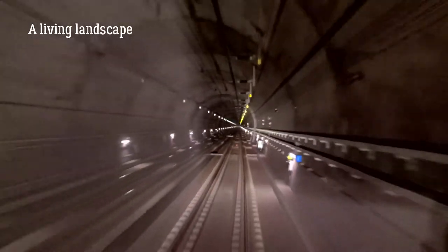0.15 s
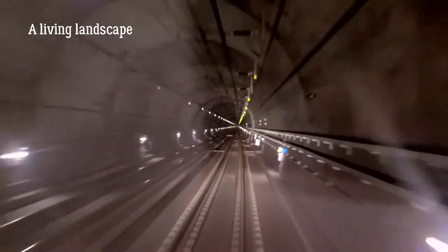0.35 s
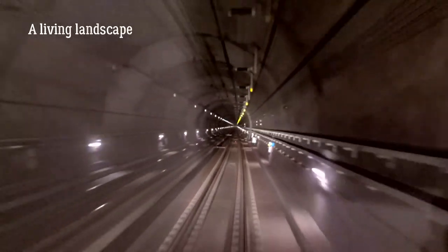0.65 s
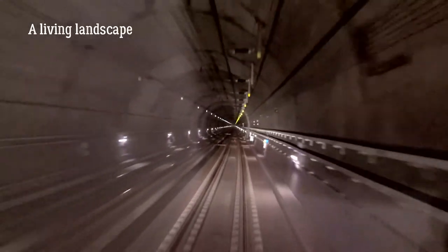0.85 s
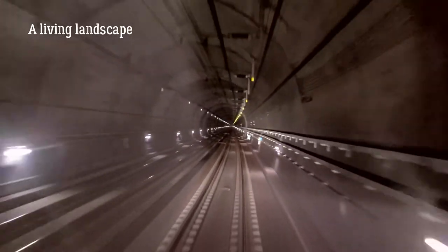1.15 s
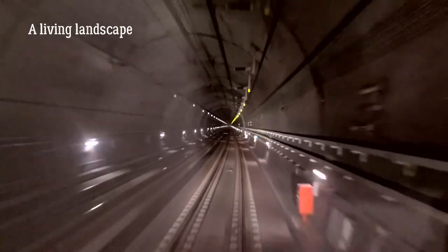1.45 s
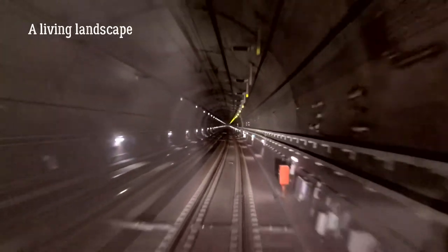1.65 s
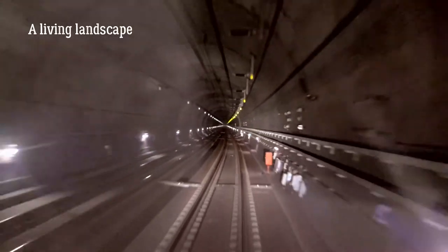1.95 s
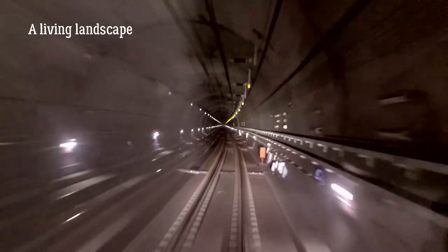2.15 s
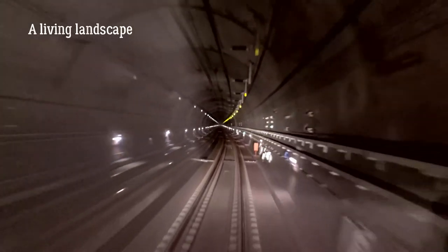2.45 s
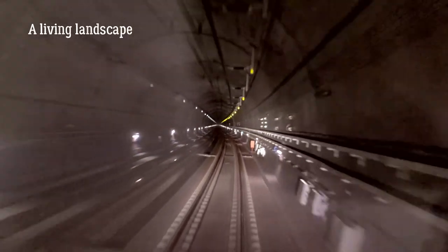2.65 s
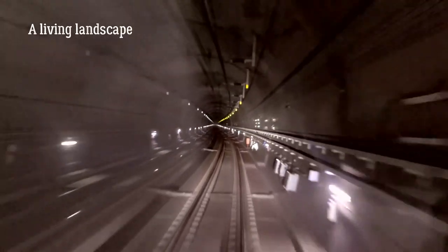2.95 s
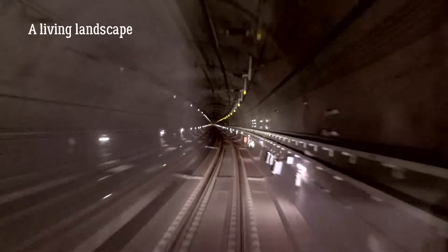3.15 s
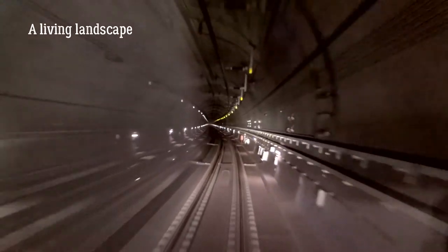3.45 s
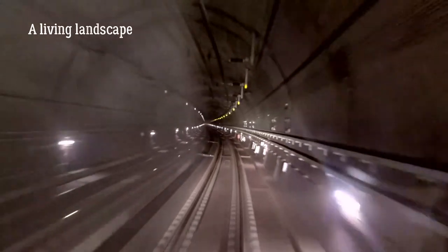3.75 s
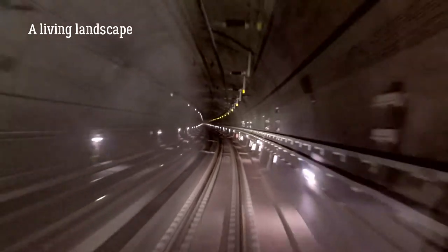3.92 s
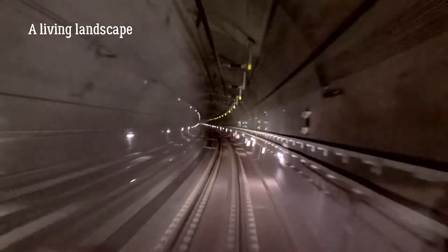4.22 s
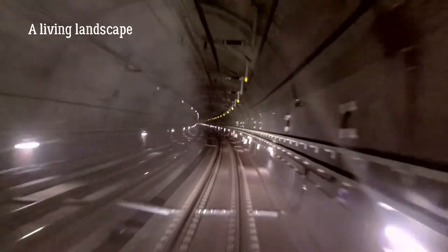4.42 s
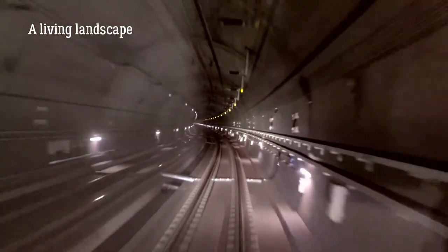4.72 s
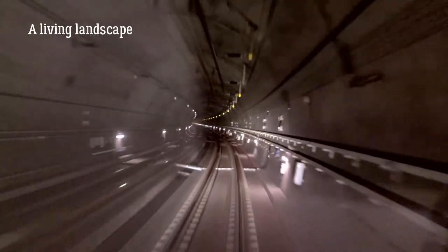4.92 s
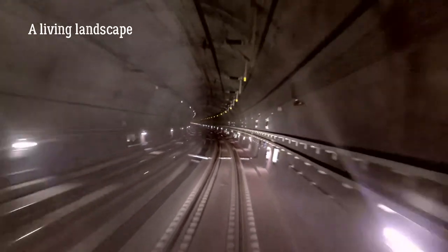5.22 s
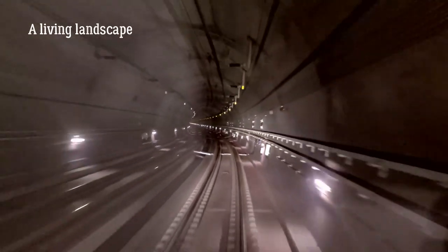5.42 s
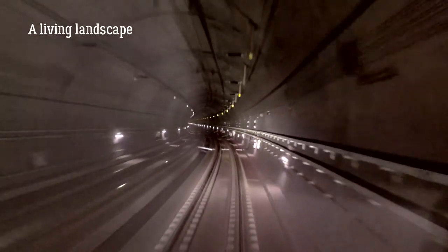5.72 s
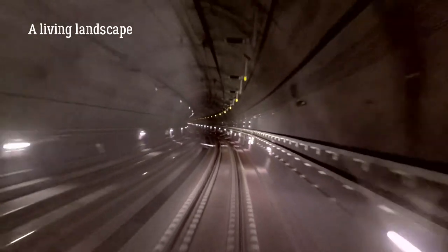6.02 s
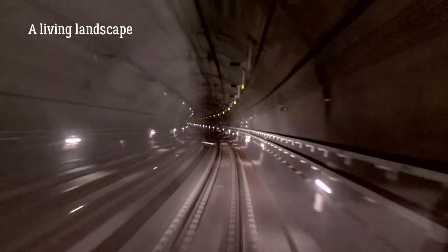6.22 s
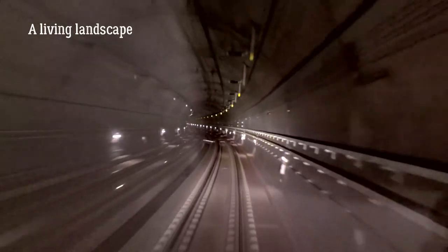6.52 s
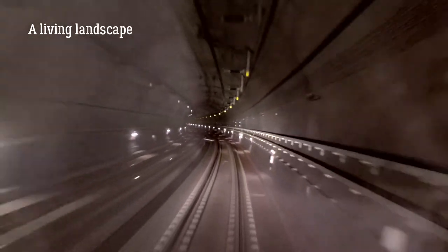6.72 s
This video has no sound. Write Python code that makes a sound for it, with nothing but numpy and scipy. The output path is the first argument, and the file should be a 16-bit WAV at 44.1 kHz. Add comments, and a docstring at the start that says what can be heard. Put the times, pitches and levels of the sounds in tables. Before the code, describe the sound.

Driver's cab of a subway train running fast through a tunnel. A loud, deep, centered rumble never stops, with a mid-low roar through floor and windows and a dull rush of air. Fuzzy humming tones of body and wheels flutter and briefly swell, more strongly later. A thin high whistle is barely there; a few soft fittings tick. Close stereo microphones inside the cab, bass in the middle, upper sounds spread wide.

```python
"""A deep mono rumble, a roar through floor and windows, a dull hiss of air and fuzzy ringing tones: the cab
of a subway train running fast through a tunnel. A thin whistle and a few ticking fittings lie on top.
Rumble, roar and air are shaped noise, raised or lowered by how hard the track shakes the car; strong body and
wheel modes are tones of wandering pitch, weak modes and whistle are noise through resonances, ticks are noise puffs.
Two spaced microphones hear the bass alike and the rest differently."""
import sys
import numpy as np
from scipy import signal
from scipy.fft import rfft, irfft, next_fast_len
from scipy.io import wavfile
from scipy.ndimage import uniform_filter1d, minimum_filter1d, map_coordinates

SR = 44100
rng = np.random.default_rng(int(sys.argv[2]) if len(sys.argv) > 2 else 0)


def unload_audio(sound):
    """Save the sound as a 16-bit wav file, at the path given as the first command line argument."""
    columns = np.transpose(np.atleast_2d(sound))
    # keep every value between -1 and 1, then stretch to whole-number steps
    steps = np.round(np.clip(columns, -1, 1) * 32767)
    wavfile.write(sys.argv[1], SR, steps.astype(np.int16))


N = 302967

# strong body and wheel modes: (frequency [Hz], wander [Hz], L-R [dB], L-R likeness [-1..1],
# level at zero drive [dB], growth [dB per dB of drive], flutter depth [dB])
STRONG_MODES = [(65.5, 4, 0.5, 0.99, -21, 0.36, 4), (295.2, 8.99, 2, 0.96, -30, 0.1, 9),
                (385, 10, 4.5, 0.9, -30, 0, 9), (424.2, 5, 6.5, 0.42, -32, 1, 9),
                (501.3, 4, -1, 0.35, -37.5, 2.2, 9), (766.3, 12.02, 7, 0.66, -29, 1.34, 9),
                (796.4, 12, 1.5, 0.85, -30, 1, 9.5)]


def amp(db):
    """Amplitude ratio of a level in dB."""
    return 10 ** (np.asarray(db) / 20)


def unit(x):
    """x scaled to rms 1."""
    return x / np.sqrt(np.mean(x ** 2) + 1e-20)


def along(points, hz):
    """Interpolate (frequency [Hz], value) points on a log frequency axis."""
    point_hz, value = np.transpose(points)
    return np.interp(np.log(hz + 1), np.log(point_hz + 1), value)


def curve(points):
    """Interpolate (time [s], value) points to one value per sample."""
    time_s, value = np.transpose(points)
    return np.interp(np.arange(N) / SR, time_s, value)


def wobble(knots_per_s):
    """Smooth random curve through normally distributed knots."""
    knots = rng.standard_normal(int(N * knots_per_s / SR) + 4)
    return map_coordinates(knots, [np.arange(N) * knots_per_s / SR])


def filtered(x, response):
    """Multiply the spectrum of x by a response of frequency."""
    m = next_fast_len(N + 8192)
    return irfft(rfft(x, m) * response(np.fft.rfftfreq(m, 1 / SR)), m)[..., :N]


def spread(alike, lean_db):
    """Gains mixing two unrelated signals into left and right with a given correlation and L-R level."""
    turn = np.arccos(np.clip(alike, -1, 1)) / 2
    half_lean_db = lean_db / 2 * np.ones_like(turn)
    mix = np.array([[np.cos(turn), np.sin(turn)], [np.cos(turn), -np.sin(turn)]])
    return mix * amp([[half_lean_db], [-half_lean_db]])[:, 0][:, None] if np.ndim(turn) == 0 else (
        mix * amp([[half_lean_db], [-half_lean_db]]))


def rush(spectrum, patchy_db):
    """Stereo noise with time-frequency patches of random gain; the mean of both sides has rms 1."""
    # left-right likeness, negative = opposite phase: (frequency [Hz], likeness [-1..1])
    likeness = [(30, 1), (120, 1), (250, 1), (340, 0.77), (450, 0), (560, -0.36), (750, 0.25), (900, .2),
                (1050, -0.12), (1200, -0.83), (1400, -0.24), (1750, -0.084), (2300, 0.098), (3500, -0.038),
                (8000, .1), (12000, -0.37)]
    # stereo balance: (frequency [Hz], L-R [dB])
    lean = [(60, 0), (86, 0.0), (120, -1), (180, 1.5), (250, 1.5), (360, 3), (510, 5), (730, 3.0),
            (1050, -1.0), (1500, -1.0), (2140, 2.5), (3060, 3), (5000, 2.5), (8000, -1), (14000, -1.0)]
    bins = signal.stft(rng.standard_normal((2, N)), nperseg=512)[2]
    patches = uniform_filter1d(rng.standard_normal(bins.shape[1:]), 6, 0)
    patches = unit(uniform_filter1d(patches, 14, 1))
    pair = signal.istft(bins * amp(patchy_db * patches), nperseg=512)[1][:, :N]

    def response(hz):
        return amp(along(spectrum, hz)) * spread(along(likeness, hz), along(lean, hz))

    out = filtered(pair, response).sum(axis=1)
    return out / out.mean(axis=0).std()


def ringing(hz, width_hz, lean_db, alike):
    """Random forcing through one resonance, applied twice for steep skirts."""
    def peak(f):
        return (1j * f * width_hz / (hz * hz - f * f + 1j * f * width_hz)) ** 2

    return spread(alike, lean_db) @ unit(filtered(rng.standard_normal((2, N)), peak))


def rumble(drive_db):
    """Bass noise from wheel and rail roughness; it eases slightly as drive rises."""
    # (frequency [Hz], density [dB per Hz, relative])
    spectrum = [(12, -29.5), (28, 6), (50, 6), (85, 6), (150, 7), (185, 0.5), (230, -1), (330, -2.5),
                (600, -57), (1500, -120)]
    return amp(-20 - 0.2 * drive_db) * rush(spectrum, patchy_db=1.0)


def roar(drive_db):
    """Noise through floor and windows, plus weak modes as resonances whose level follows it."""
    # (frequency [Hz], density [dB per Hz, relative])
    spectrum = [(60, -120), (150, -18), (260, -0.5), (330, -2), (400, 3.5), (480, 0.5), (560, -7.5),
                (700, -3), (820, -4), (880, -11), (1050, -20), (1400, -55), (3000, -120)]
    # (frequency [Hz], width of one resonance pass [Hz], level re roar gain [dB], L-R [dB], L-R likeness [-1..1])
    weak_modes = [(84.6, 20, -5.5, -0.5, 1), (204.9, 15, -8.5, -1, 0.99), (234, 14, -9, 0, 0.99),
                  (613.7, 24, -11, 0, -0.0078), (673, 40, -8.5, 0, -0.46), (718.7, 24, -10.5, 0, -0.2),
                  (842, 25, -18.5, 3.5, -0.19), (887, 20, -23, 4.5, -0.37), (952, 25, -21.5, 1, 0.057),
                  (1495, 42, -29, -1, 0.38), (1587.5, 36, -28, 2.5, 0.069), (1890, 36, -39.5, 1.5, 0.52),
                  (2014, 51, -35.5, -4, -0.067), (2150, 25, -40, -4, .6), (2317, 33, -39.5, 8, 0.52),
                  (2540, 33, -48, 11, .3), (8800, 30, -67, -2.5, .3)]
    modes = sum(amp(db) * ringing(hz, width_hz, lean_db, alike)
                for hz, width_hz, db, lean_db, alike in weak_modes)
    return amp(-20 + 0.81 * drive_db) * (rush(spectrum, patchy_db=1.03) + modes)


def air_noise(drive_db):
    """Whoosh and two treble hiss bands; track unevenness moves their levels together."""
    # spectra: (frequency [Hz], density [dB per Hz, relative])
    whoosh = [(300, -120), (700, -20), (1000, 2), (1200, -0.5), (1500, -5.5), (1750, -11), (2500, -18.5),
              (3500, -21), (4200, -28), (5500, -31.5), (6000, -37.5), (7500, -57.5), (12000, -120)]
    hiss = [(2500, -120), (5000, -7), (6200, 0), (7800, 0.5), (9200, -5), (11000, -22), (16000, -69.5)]
    top_hiss = [(4000, -120), (8500, -7), (10000, -0.5), (12500, -0.5), (15700, -6.5)]
    # treble hiss level offset: (time [s], level [dB])
    air = [(0.0, .3), (1.2, 0.3), (1.45, 1.3), (1.8, -.8), (2.3, .6), (3.7, -0.5), (4.05, 1.3), (4.6, -0.7),
           (5.15, 1.2), (5.45, -1.2), (6.87, 0.2)]
    shake = wobble(10)
    air_db = curve(air) + 0.2 * drive_db
    return (amp(-37 + 0.27 * drive_db + 0.17 * shake) * rush(whoosh, patchy_db=1.02)
            + amp(-66.5 + air_db + 0.6 * shake) * rush(hiss, patchy_db=1.2)
            + amp(-73 + air_db + 0.8 * shake) * rush(top_hiss, patchy_db=1.4))


def singing(hz):
    """How far a strong mode is singing out (0-1), and its rise in dB."""
    # the nearest strong mode sings: (start [s], length [s], mode [Hz], rise when fully held [dB])
    swells = [(0.523, .18, 66, 5), (0.654, 0.073, 296, 8), (1.253, .13, 296, 7.5), (1.86, .07, 66, 5),
              (1.961, 0.081, 798, 6), (2.196, .14, 425, 9), (2.58, .2, 385, 8), (2.682, 0.086, 66, 7.5),
              (2.97, 0.098, 798, 7.5), (3.0, .07, 296, 8), (3.331, .08, 296, 7), (3.431, 0.084, 425, 10.5),
              (3.618, 0.14, 769, 7), (3.646, 0.17, 798, 5.5), (3.91, .07, 66, 4.5),
              (4.096, 0.23, 296, 10.5), (4.27, 0.079, 769, 7), (4.28, 0.076, 66, 6), (4.45, .06, 66, 4.5),
              (4.55, .12, 769, 4.5), (4.932, 0.096, 769, 8), (4.927, 0.09, 798, 3.5),
              (5.052, 0.11, 296, 10.5), (5.302, 0.12, 769, 7.5), (5.364, .22, 296, 9.5),
              (5.451, .1, 501, 12.5), (5.518, 0.18, 769, 7), (5.544, .08, 66, 4), (5.745, .13, 425, 13),
              (5.791, 0.25, 501, 12.5), (6.005, 0.16, 769, 7.5), (6.033, .35, 425, 13), (6.12, .28, 385, 8),
              (6.381, .07, 66, 4.5), (6.7, .1, 769, 6.5), (6.7, .09, 798, 6), (6.721, .08, 66, 4)]
    edge_s = 0.026
    t, modes_hz = np.arange(N) / SR, np.array(STRONG_MODES)[:, 0]
    held, rise_db = np.zeros(N), np.zeros(N)
    for start_s, length_s, swell_hz, db in swells:
        if modes_hz[np.argmin(abs(modes_hz - swell_hz))] == hz:
            hold = (np.tanh((t - start_s) / edge_s) - np.tanh((t - start_s - length_s) / edge_s)) / 2
            held, rise_db = held + hold, rise_db + db * hold
    return held, rise_db


def strong_modes(drive_db):
    """Tones whose pitch and size wander as the forcing changes; each steadies while it sings out."""
    steady_share = 0.65  # share of the wander that stops while singing
    flutter_top = 1.1  # flutter peaks stay below this times the depth; dips go deeper
    out = 0
    for hz, wander_hz, lean_db, alike, level_db, grows, depth_db in STRONG_MODES:
        held, rise_db = singing(hz)
        loose = 1 - steady_share * held
        pitch_hz = hz + loose * wander_hz * np.array([wobble(24), wobble(24)])
        size = amp(loose * 1.7 * np.array([wobble(22), wobble(22)]))
        pair = unit(size * np.sin(2 * np.pi * np.cumsum(pitch_hz, axis=1) / SR))
        flutter = flutter_top * (1 - np.exp(-wobble(12) / flutter_top / 2))
        flutter_db = depth_db * (1 - held) * flutter
        gain = amp(level_db + grows * drive_db + rise_db + flutter_db)
        out = out + gain * (spread(alike, lean_db) @ pair)
    return out


def whistle():
    """Thin high whistle: a few narrow strands of resonant noise."""
    # (time [s], level [dB])
    level = [(0.0, -67), (1.1, -66.5), (1.5, -71), (2.5, -71.5), (2.9, -69), (4.9, -68.5), (5.2, -64),
             (5.9, -63.5), (6.1, -68.5), (6.35, -62.5), (6.87, -66.5)]
    # (frequency [Hz], width of one resonance pass [Hz], relative level [dB])
    strands = [(5280, 40, -3), (5350, 26, -1.5), (5330, 170, -2.5), (5440, 50, -5)]
    mix = sum(amp(db) * ringing(hz, width_hz, 1.5, .3) for hz, width_hz, db in strands)
    return amp(curve(level)) * unit(mix)


def ticks():
    """Short soft rattles of loose fittings: decaying grainy puffs of treble."""
    # (time [s], rms level before onset and decay [dB], upper edge [Hz], t60 [s], L-R [dB])
    rattles = [(2.206, -57, 9000, .25, 2), (5.165, -54, 12000, .13, 2), (5.233, -54, 9500, .12, 0),
               (5.774, -56, 9500, .3, 2), (6.397, -48, 14000, .14, 1)]
    out, t = np.zeros((2, N + SR)), np.arange(SR // 4) / SR
    for start_s, db, top_hz, t60_s, lean_db in rattles:
        band = signal.butter(2, [5800 / SR * 2, top_hz / SR * 2], "band")
        dull = signal.lfilter([1], [1, -1.6, .64], rng.standard_normal((2, len(t))))  # tilt toward the lows
        grain = unit(signal.lfilter(*band, dull))
        puff = grain * amp(db - 60 * t / t60_s) * (1 - np.exp(-t / .002))  # 2 ms onset
        out[:, round(start_s * SR):][:, :len(t)] += amp([[lean_db / 2], [-lean_db / 2]]) * puff
    return out[:, :N]


def scene():
    """All layers under one track drive, ending in a short fade."""
    # how hard the track shakes the car: (time [s], level [dB])
    drive = [(0.0, -2.5), (1.2, -2.5), (2.3, -1.3), (3.1, -0.5), (3.7, 0.8), (4.6, 0.54), (5.5, 1.47),
             (6.2, 1), (6.87, 1)]
    fade_s = 0.006
    drive_db = curve(drive)
    to_end_s = np.arange(N)[::-1] / SR
    fade = np.sin(np.pi / 2 * np.minimum(1, to_end_s / fade_s)) ** 2
    tones = strong_modes(drive_db) + whistle()
    noise = rumble(drive_db) + roar(drive_db) + air_noise(drive_db)
    return (tones + noise + ticks()) * fade


def record(dry):
    """A limiter holds the loudest crests near full scale; a steep low-pass then drops the extreme treble."""
    top_hz = 15720
    need = np.minimum(1, .995 / (np.abs(dry).max(axis=0) + 1e-9))
    gain = minimum_filter1d(need, size=257)
    gain = uniform_filter1d(uniform_filter1d(gain, size=129), size=129)
    # mirrored ends keep the filter from ringing at the edges
    padded = np.pad(dry * gain, ((0, 0), (4096, 4096)), "reflect", reflect_type="odd")
    m = padded.shape[1]
    return irfft(rfft(padded) * (np.fft.rfftfreq(m, 1 / SR) < top_hz), m)[:, 4096:-4096]


dry = scene()
out = record(dry)
unload_audio(out)
```